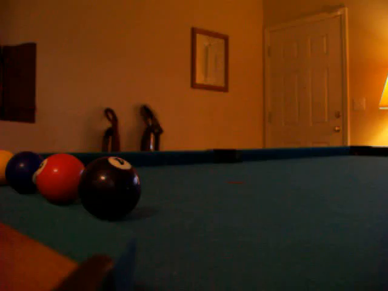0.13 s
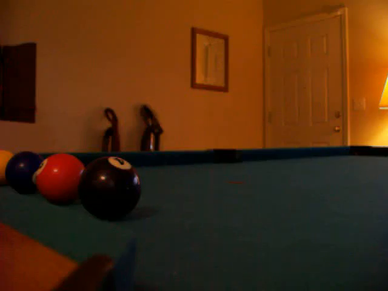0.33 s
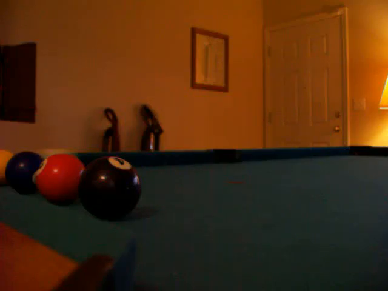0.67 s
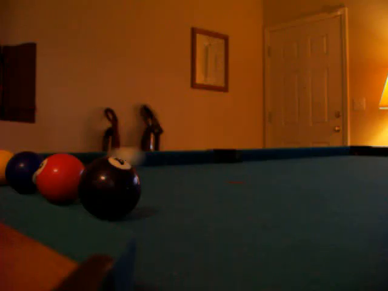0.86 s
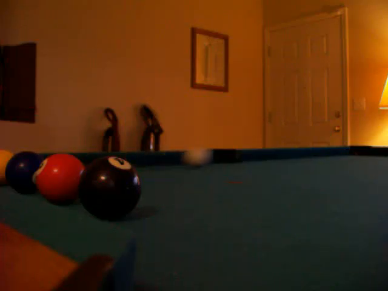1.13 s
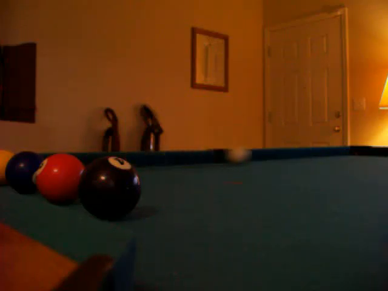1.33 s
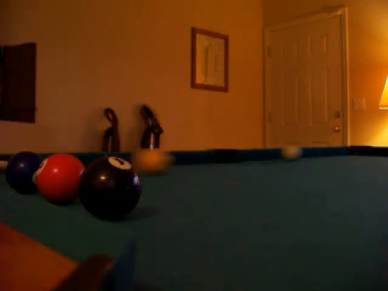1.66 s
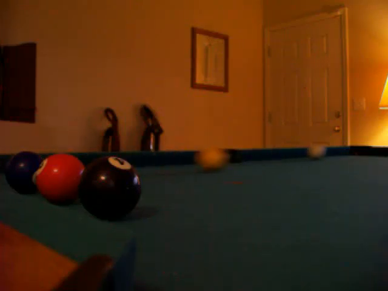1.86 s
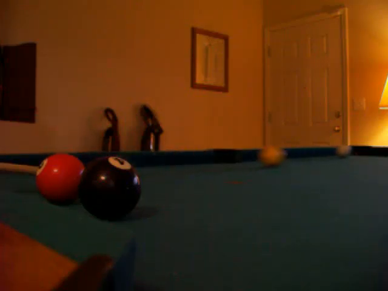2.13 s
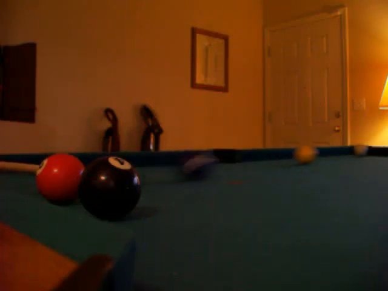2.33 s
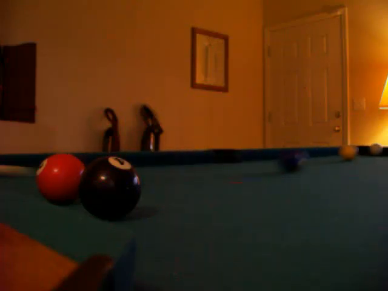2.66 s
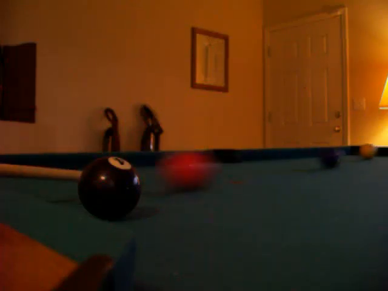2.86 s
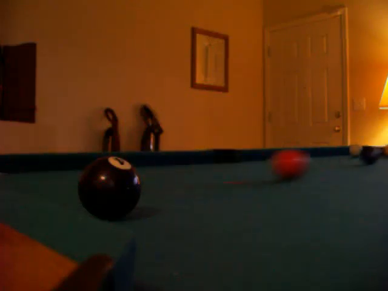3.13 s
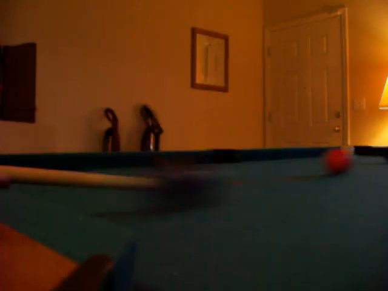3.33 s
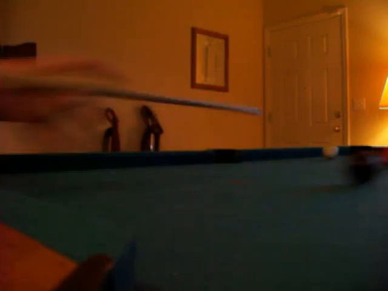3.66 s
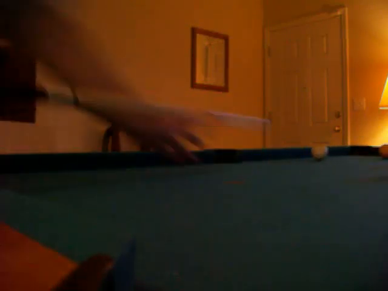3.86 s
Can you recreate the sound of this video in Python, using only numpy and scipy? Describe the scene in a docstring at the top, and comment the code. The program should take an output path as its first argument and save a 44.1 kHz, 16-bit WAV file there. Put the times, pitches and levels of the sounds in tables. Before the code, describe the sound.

Billiard cue shots: faint camera hiss with tiny rapid ticks, then a loud, hard clack with woody thud at 0.6 seconds. More follow at 1.4, 2.1, 2.7 and 3.3, the last doubled and scuffing. Each rings briefly in a small room, and low rumble of rolling balls fills the gaps. Dull far bumps come around 2.65 and from 3.6 to the end. Close, muffled, slightly overloaded microphone.

```python
"""Five cue shots strike billiard balls, one after another, right beside a small camera on the table.
Each shot sums decaying sines (thud, ring), a rebound pulse, a gritty hiss and a brief hard clack.
Noise bursts give the room's reverberation, the far bumps and the scuffs; low sines give the booms.
Resonators driven by noise make the balls rumble over slate and frame; the camera hisses and ticks.
The microphone is narrow in band and rounds off the overloading peaks."""
import sys
import numpy as np
from scipy import signal
from scipy.fft import rfft, irfft
from scipy.io import wavfile
from scipy.ndimage import uniform_filter1d

SR = 44100
rng = np.random.default_rng(int(sys.argv[2]) if len(sys.argv) > 2 else 0)


def waveform_to_disk(signal):
    """Save audio, clipped to [-1, 1], as 16-bit WAV at the path in sys.argv[1]."""
    frames = np.transpose(np.atleast_2d(signal))
    scaled = np.clip(frames, -1, 1) * 32767
    samples = np.round(scaled).astype(np.int16)
    wavfile.write(sys.argv[1], SR, samples)


N = 176400
T = np.arange(N) / SR


def from_db(db):
    """Logarithmic level: decibels to amplitude gain."""
    return 10 ** (np.asarray(db) / 20)


def rms_one(x):
    """Normalisation: scale to unit rms."""
    return x / np.sqrt(np.mean(x ** 2) + 1e-20)


def level(rows):
    """Amplitude modulation: gain over time, interpolated in decibels from (t/s, level/dB) rows."""
    return from_db(np.interp(T, *np.transpose(rows)))


def noise(spectrum):
    """Spectral shaping: unit noise with the given colour, falling away outside it."""
    hz, db = np.transpose(spectrum)
    f = np.arange(N // 2 + 1) * SR / N + 1e-3
    low_skirt = 1 + (.5 * hz[0] / f) ** 4
    high_skirt = 1 + (.5 * f / hz[-1]) ** 4
    colour = from_db(np.interp(np.log(f), np.log(hz), db)) / np.sqrt(low_skirt * high_skirt)
    return rms_one(irfft(rfft(rng.standard_normal(N)) * colour, N))


def evened(x, span_s):
    """Level control: hold a noise at unit level over spans longer than span_s."""
    power = uniform_filter1d(x * x, max(int(span_s * SR), 2))
    return x / np.sqrt(np.abs(power) + 1e-12)


def ring(s, hz, t60):
    """Damped free vibration: an exponentially decaying sine that starts at s."""
    out, start = np.zeros(N), int(s * SR)
    age = np.maximum(T[start:start + int(2 * t60 * SR)] - s, 0)
    out[start:start + len(age)] = np.sin(2 * np.pi * hz * age) * 1e-3 ** (age / t60)
    return out


def burst(s, attack_s, hold_s, t60):
    """Build-up and exponential decay: an envelope that rises, holds and dies away."""
    age = np.maximum(T - s, 0)
    decay = 1e-3 ** np.minimum(np.maximum(age - hold_s, 0) / t60, 4)
    return (1 - np.exp(-age / attack_s)) * decay


def swell(s, width_s):
    """Gaussian pulse: a bell-shaped envelope around s."""
    return np.exp(-.5 * np.minimum(((T - s) / width_s) ** 2, 100))


def resonating(modes, low_hz, high_hz):
    """Resonance under random excitation: noise drives a set of modes into an evened rumble."""
    out = sum(from_db(db) * signal.lfilter(*signal.iirpeak(hz, hz / width, fs=SR), rng.standard_normal(N))
              for hz, width, db in modes)
    band = signal.butter(2, [low_hz, high_hz], "band", fs=SR, output="sos")
    return evened(signal.sosfilt(band, out), span_s=0.11)


# spectrum of the camera's hiss: [f/Hz, relative level/dB per Hz]
HISS_SPECTRUM = [(25, 2.5), (60, -1), (105, -9), (185, -2), (300, -10), (600, -14.5), (1000, -18.5),
                 (2500, -22), (4200, -23), (5500, -30.5), (6400, -45.5)]
HISS_DB, TICK_DB = -39.5, -37
TICK_START_S, TICK_PERIOD_S, TICK_LOWEST_HZ = .0638, .05667, 4185


def hiss():
    """Stationary noise: a steady hiss, with a faint periodic train of short high tones."""
    ticks = sum(ring(s, TICK_LOWEST_HZ * rng.uniform(1.0, 1.03), t60=0.012)
                for s in np.arange(TICK_START_S, T[-1], TICK_PERIOD_S))
    return from_db(HISS_DB) * noise(HISS_SPECTRUM) + from_db(TICK_DB) * ticks


SLATE_DB, FRAME_DB, MURMUR_DB = -0.5, -0.5, -1   # trims on the level tracks below
# deep resonances of the slate: [f/Hz, width/Hz, relative level/dB]
SLATE_MODES = [(90.4, 7.6, -0.5), (112.8, 18.7, -3)]
# higher resonances of the frame: [f/Hz, width/Hz, relative level/dB]
FRAME_MODES = [(183, 15.6, 0), (206.6, 24, -7.5), (237.4, 16, -9), (290.4, 8.7, -6.5)]
# spectrum of the cloth's murmur: [f/Hz, relative level/dB per Hz]
MURMUR_SPECTRUM = [(150, -8.5), (280, -5.5), (380, 5.5), (500, -6.5), (700, -9), (1000, -24), (2000, -29)]
# deep rumble of the rolling balls over time: [t/s, level/dB]
DEEP_TRACK = [(0.55, -41), (0.57, -30), (0.65, -20.5), (0.77, -36.5), (0.98, -19.5), (1.26, -24),
              (2.32, -22), (2.37, -19), (2.6, -25.5), (2.66, -12.5), (2.7, -21.5), (3.02, -18),
              (3.16, -29.5), (3.2, -16), (3.38, -27), (3.4, -16.5), (3.69, -20.5), (4.0, -15.5)]
# upper part of the rumble, one group per gap between shots and after the last: [t/s, level/dB]
UPPER_TRACKS = [
    [(0.76, -35), (0.832, -35), (0.892, -24), (1.272, -30), (1.39, -27)],
    [(1.55, -27), (1.604, -33.5), (1.716, -27.5), (1.934, -31), (2.06, -23.5)],
    [(2.25, -27.5), (2.316, -27.5), (2.332, -32.5), (2.376, -24.5), (2.63, -27)],
    [(2.9, -31), (2.94, -36), (2.98, -22.5), (3.27, -28), (3.31, -21.5)],
    [(3.5, -21), (3.526, -19.5), (3.788, -17.5), (3.918, -32), (3.95, -24)],
]
# murmur of the cloth, in the same groups: [t/s, level/dB]
MURMUR_TRACKS = [
    [(0.75, -52), (1.038, -34.5), (1.39, -49.5)],
    [(1.62, -43.5), (1.7, -34.5), (2.06, -37)],
    [(2.3, -31.5), (2.624, -32.5), (2.63, -31)],
    [(2.98, -31.5), (3.304, -34), (3.31, -43)],
    [(3.55, -28), (3.756, -34.5), (3.95, -30)],
]


def rolling():
    """Forced vibration: the cloth's weave shakes the rolling balls, which drive slate and frame."""
    slate = from_db(SLATE_DB) * level(DEEP_TRACK) * resonating(SLATE_MODES, low_hz=55.3, high_hz=168.5)
    frame_level = from_db(FRAME_DB) * level(np.vstack(UPPER_TRACKS))
    frame = frame_level * resonating(FRAME_MODES, low_hz=129, high_hz=335)
    murmur_level = from_db(MURMUR_DB) * level(np.vstack(MURMUR_TRACKS))
    murmur = murmur_level * evened(noise(MURMUR_SPECTRUM), span_s=0.066)
    after_first_shot = T > SHOT_EVENTS[0][0]
    return (slate + frame + murmur) * after_first_shot


# the cue scuffs and jogs the table: [middle t/s, width/s, rub level/dB, jog level/dB]
SCUFF_EVENTS = [(1.067, 0.0067, -38.5, -11), (1.908, 0.0069, -40.5, -14.5), (2.387, 0.0092, -37.5, -6.5),
                (2.666, 0.0019, -28.5, -17), (3.224, 0.017, -40, -21.5), (3.408, 0.0017, -29, -15),
                (3.416, 0.0008, -21.5, -16), (3.422, 0.0027, -21.5, -7.5), (3.438, 0.0024, -30, -10),
                (3.819, 0.012, -32, -17.5)]
# spectrum of the rub, also of the tip's scratch: [f/Hz, relative level/dB per Hz]
RUB_SPECTRUM = [(400, 0.5), (1400, 1), (2300, -3.5), (3400, 0.5), (4800, -9), (6000, -19.5)]
JOG_HZ = 99.1


def scuffs():
    """Friction noise: a short rub, with a low oscillating jog of the table under it."""
    rub = noise(RUB_SPECTRUM)
    out = np.zeros(N)
    for s, width, rub_db, jog_db in SCUFF_EVENTS:
        jog = np.cos(2 * np.pi * JOG_HZ * (T - s))
        out += from_db(rub_db) * rub * swell(s, width)
        out += from_db(jog_db) * jog * swell(s, 1.07 * width)
    return out


# balls meet far cushions and each other: [t/s, bump level/dB, click level/dB]
BUMP_EVENTS = [(2.64, -16, -29), (2.666, -19.5, -57), (3.570, -29, -63.5), (3.667, -23.5, -46),
               (3.761, -15, -42.5), (3.961, -16, -28.5), (3.984, -11, -42)]
# spectrum of the dull bump: [f/Hz, relative level/dB per Hz]
BUMP_SPECTRUM = [(70, -12), (180, -4.5), (380, 9), (600, -1.5), (1000, -24.5), (3000, -54.5)]
# spectrum of the click: [f/Hz, relative level/dB per Hz]
CLICK_SPECTRUM = [(400, -16), (900, 9.5), (2000, 1), (3500, -13), (6000, -20.5)]
BUMP_ATTACK_S, BUMP_T60_S = 0.0026, 0.24
CLICK_ATTACK_S, CLICK_T60_S = .0007, .2


def bumps():
    """Diffuse reflection: far impacts arrive blurred by the room, a dull bump with a weak click."""
    dull, click = evened(noise(BUMP_SPECTRUM), span_s=0.019), noise(CLICK_SPECTRUM)
    return sum(from_db(db) * dull * burst(s, BUMP_ATTACK_S, 0, BUMP_T60_S)
               + from_db(click_db) * click * burst(s, CLICK_ATTACK_S, 0, CLICK_T60_S)
               for s, db, click_db in BUMP_EVENTS)


# low knocks of the table frame after a shot: [t/s, level/dB, f/Hz]
BOOM_EVENTS = [(0.598, -9, 252.4), (0.640, -20, 175), (2.750, -10, 289), (2.800, -13, 404),
               (3.571, -11, 201.6)]
BOOM_ATTACK_S, BOOM_T60_S = 0.0021, 0.23


def booms():
    """Single-mode resonance: dull knocks of the frame, each a softly started, decaying low note."""
    out = np.zeros(N)
    for s, db, hz in BOOM_EVENTS:
        onset = 1 - np.exp(-np.maximum(T - s, 0) / BOOM_ATTACK_S)
        out += from_db(db) * ring(s, hz, BOOM_T60_S) * onset
    return out


# spectrum of the room's answer to a shot: [f/Hz, relative level/dB per Hz]
ROOM_SPECTRUM = [(60, -10), (150, -17.5), (280, 3), (430, -1), (650, -8), (1100, -21), (2000, -30.5),
                 (3500, -32.5), (5500, -48.5)]
ROOM_DB = -13.5   # each shot's room level is added
ROOM_BUILD_S, ROOM_HOLD_S, ROOM_LOW_T60_S, ROOM_HIGH_T60_S = 0.017, 0.044, 0.37, 0.46


def room():
    """Reverberation: reflections build up after each shot, then die; the treble lasts a little longer."""
    wash = evened(noise(ROOM_SPECTRUM), span_s=0.037)
    high = signal.sosfiltfilt(signal.butter(2, 1000, "high", fs=SR, output="sos"), wash)
    low = wash - high
    out = np.zeros(N)
    for s, *_, room_db in SHOT_EVENTS:
        for band, t60 in ((low, ROOM_LOW_T60_S), (high, ROOM_HIGH_T60_S)):
            out += from_db(ROOM_DB + room_db) * band * burst(s, ROOM_BUILD_S, ROOM_HOLD_S, t60)
    return out


TIP_DB, TIP_T60_S = -13.5, 0.019


def tip_scratches():
    """Friction noise: a brief gritty hiss as the chalked tip grips each ball."""
    grips = sum(burst(s, attack_s=0.00037, hold_s=0, t60=TIP_T60_S) for s, *_ in SHOT_EVENTS)
    return from_db(TIP_DB) * noise(RUB_SPECTRUM) * grips


# hard contacts: [t/s, body level/dB, body f/Hz, body width/s,
#                 edge level/dB, edge f/Hz, edge width/s, glassy ring level/dB]
CLACK_EVENTS = [(0.572, 1.5, 1620, 0.00027, 0.5, 3250, 0.00021, -34),
                (1.4043, -2.5, 755, 0.00097, -12, 1620, 0.00039, -21),
                (2.0795, 4.5, 1520, 0.00024, -4, 3950, 0.00029, -31),
                (2.7366, 6, 1600, 0.00028, -5.5, 3940, 0.00038, -26),
                (3.3252, 1, 1330, 0.00048, 5.5, 2950, 0.00018, 1),
                (3.3573, -3.5, 1580, 0.0002, -1, 3770, 0.00015, -10)]
GLASSY_HZ, GLASSY_T60_S = 4900, .004


def clacks():
    """Impact pulse: Gaussian tone bursts of a few milliseconds, a body, an edge and a glassy ring."""
    out = np.zeros(N)
    for s, db, hz, width, edge_db, edge_hz, edge_width, glassy_db in CLACK_EVENTS:
        out += from_db(db) * swell(s, width) * np.cos(2 * np.pi * hz * (T - s))
        out += from_db(edge_db) * swell(s, edge_width) * np.sin(2 * np.pi * edge_hz * (T - s))
        out += from_db(glassy_db) * ring(s, GLASSY_HZ, GLASSY_T60_S)
    return out


# cue shots: [t/s, thud level/dB, thud pitch ratio, rebound level/dB, room and ring level/dB]
SHOT_EVENTS = [(0.571, -5, 1.174, 0, -3), (1.402, -7, 0.63, -1, -1), (2.0774, -3, 0.77, -17, 1.5),
               (2.7348, -4.5, 1.227, -18, 1), (3.3224, -6.5, 0.86, -11, 4)]
# modes of the thud, before each shot's pitch ratio: [f/Hz, relative level/dB, t60/s]
THUD_MODES = [(243, -12, 0.045), (349, -5.5, 0.078), (624, -3.5, 0.02)]
# modes of cue and table, before a slight random sharpening: [f/Hz, relative level/dB, t60/s]
RING_MODES = [(247, -30.5, 0.15), (291.6, -16.5, 0.31), (389, -43.5, 0.14), (494, -19.5, 0.48),
              (634, -34.5, 0.36), (660, -40, 0.75), (734, -28, 0.23), (804, -25.5, 0.44), (1250, -38, 0.71),
              (1346, -35, 0.17), (1630, -41, 0.64), (1954, -43, .35), (2164, -41.5, 0.71),
              (2980, -42.5, 0.33), (3700, -51, 0.3)]
REBOUND_S, REBOUND_WIDTH_S = 0.00716, 0.00044   # the shaft springs back with a second push
ECHO_S, ECHO_DB = 0.035, -5.5   # the thud comes back from the ceiling


def shots():
    """Modal superposition: tip thuds on ball, shaft rebounds, ceiling echoes, cue and table ring on."""
    out = np.zeros(N)
    for s, db, pitch, rebound_db, room_db in SHOT_EVENTS:
        thud = sum(from_db(db + mode_db) * ring(s, hz * pitch, t60) for hz, mode_db, t60 in THUD_MODES)
        echo = from_db(ECHO_DB) * np.interp(T - ECHO_S, T, thud)
        out -= thud + echo
        back = s + REBOUND_S
        push = swell(back, REBOUND_WIDTH_S) - .5 * swell(back, 2 * REBOUND_WIDTH_S)
        out += 2 * from_db(rebound_db) * push   # the factor 2 brings the peak of the push to one
        for hz, mode_db, t60 in RING_MODES:
            polarity = rng.choice([-1, 1])
            out += from_db(room_db + mode_db) * polarity * ring(s, hz * rng.uniform(1.0, 1.005), t60)
    return out


def scene():
    """Linear superposition: all sources add at the one microphone."""
    background = hiss() + rolling() + scuffs() + bumps() + booms() + room()
    return (background + tip_scratches() + clacks() + shots())[None]


START_S = 0.037   # end of the opening fade
MIC_TOP_HZ, CUTOFF_HZ = 6200, 17000
KNEE_SHARPNESS = 8


def record(dry):
    """Band limiting and saturation: the sound fades in at the very start; a narrow microphone rounds off peaks
    at full scale."""
    opening = np.clip((T - START_S) / .004 + 1, 0, 1)
    narrow = signal.sosfilt(signal.butter(22, MIC_TOP_HZ, fs=SR, output="sos"), dry * opening)
    squashed = narrow / (1 + np.abs(narrow) ** KNEE_SHARPNESS) ** (1 / KNEE_SHARPNESS)
    return signal.sosfilt(signal.butter(12, CUTOFF_HZ, fs=SR, output="sos"), squashed)


dry = scene()
out = record(dry)
waveform_to_disk(out)
```